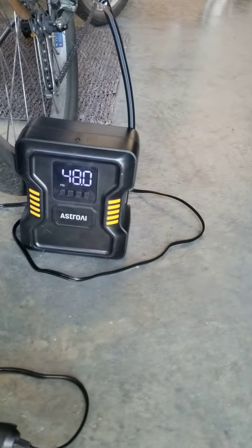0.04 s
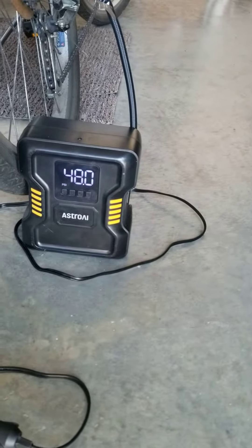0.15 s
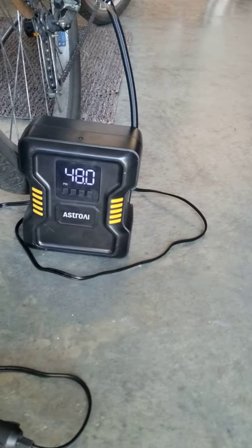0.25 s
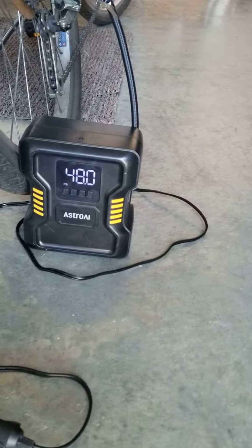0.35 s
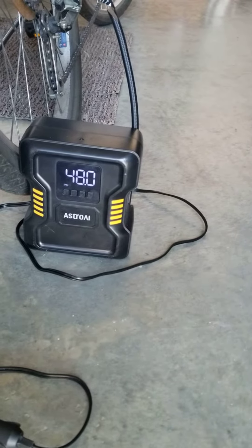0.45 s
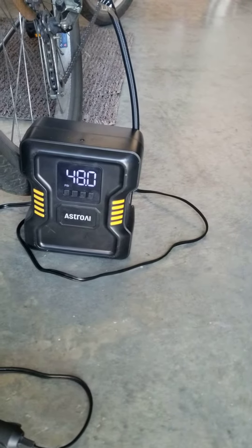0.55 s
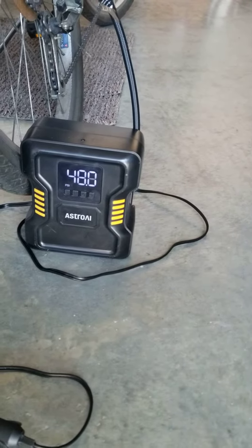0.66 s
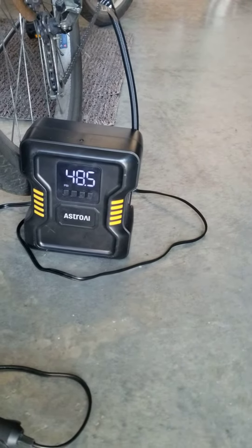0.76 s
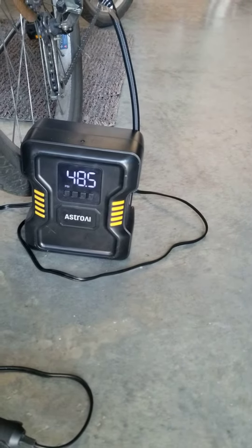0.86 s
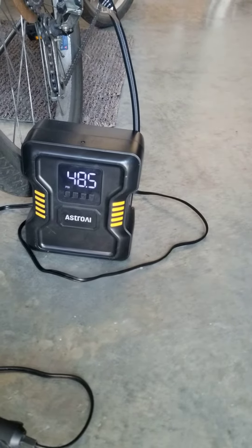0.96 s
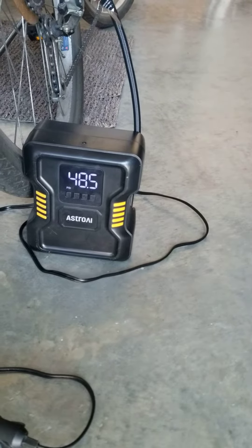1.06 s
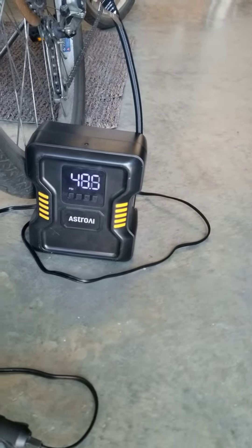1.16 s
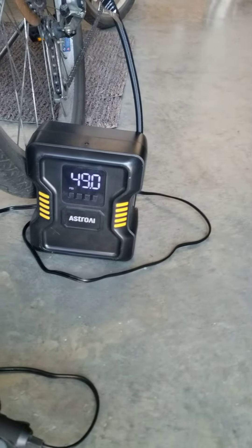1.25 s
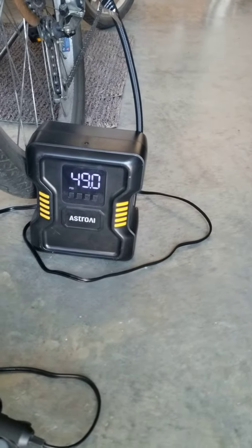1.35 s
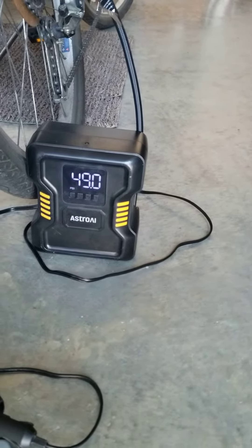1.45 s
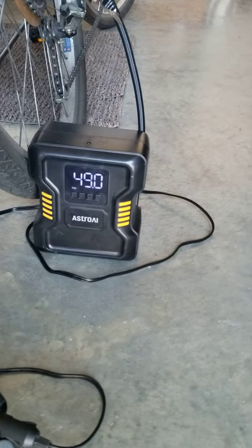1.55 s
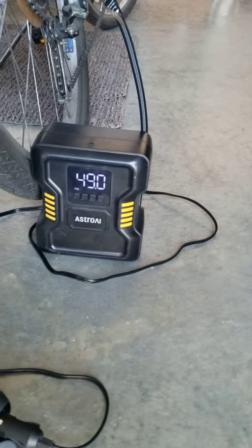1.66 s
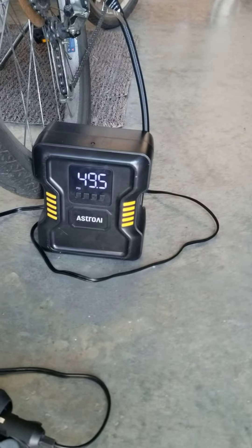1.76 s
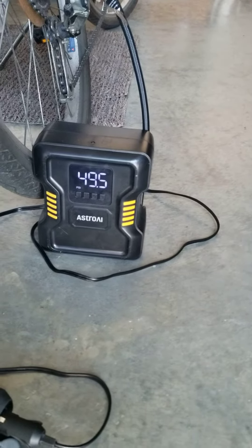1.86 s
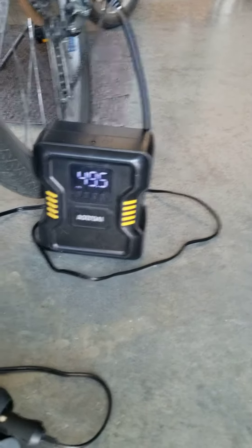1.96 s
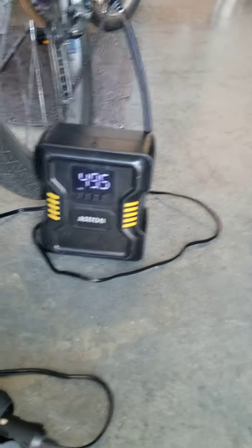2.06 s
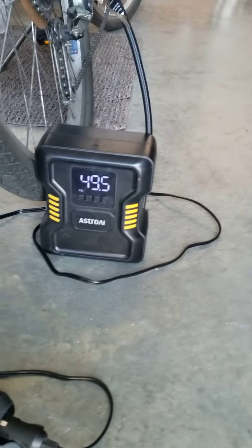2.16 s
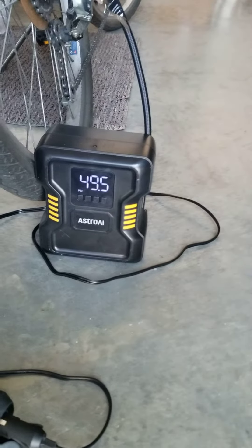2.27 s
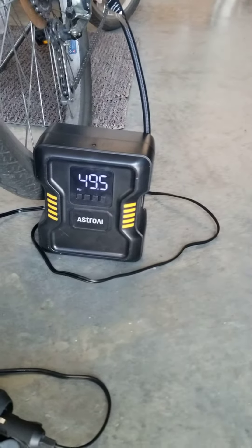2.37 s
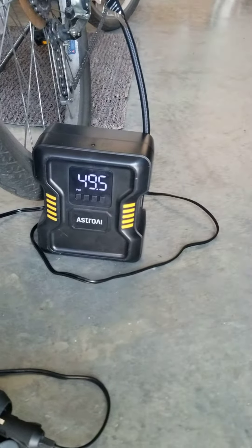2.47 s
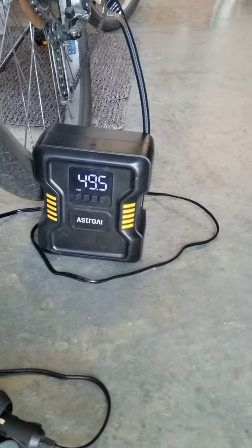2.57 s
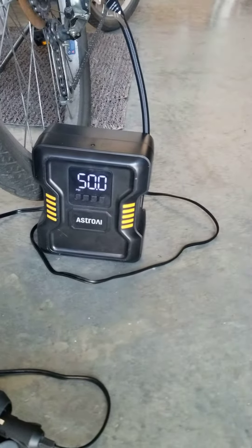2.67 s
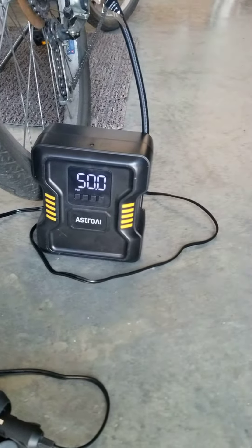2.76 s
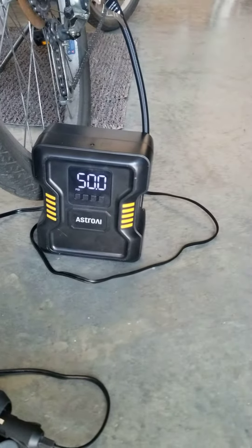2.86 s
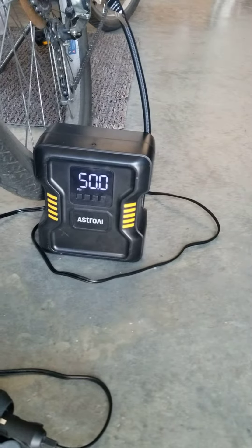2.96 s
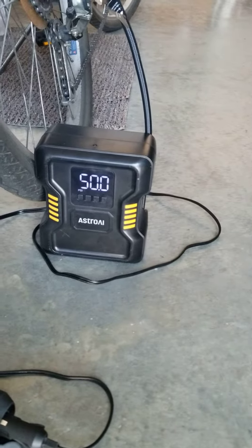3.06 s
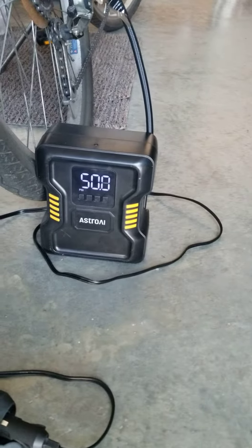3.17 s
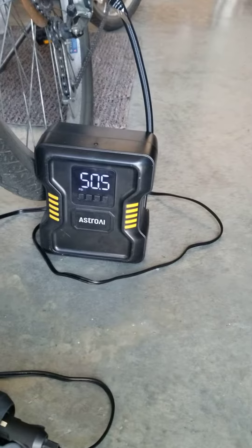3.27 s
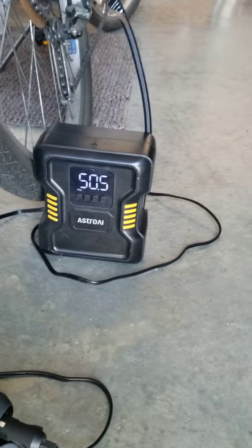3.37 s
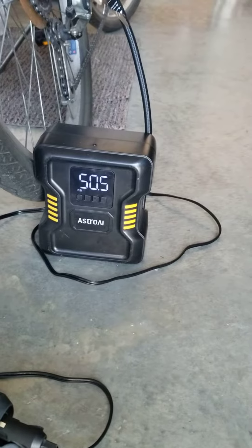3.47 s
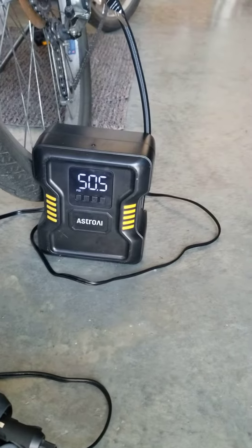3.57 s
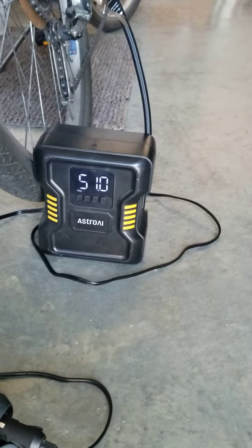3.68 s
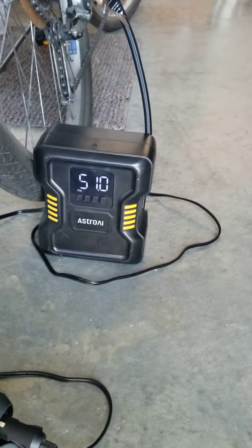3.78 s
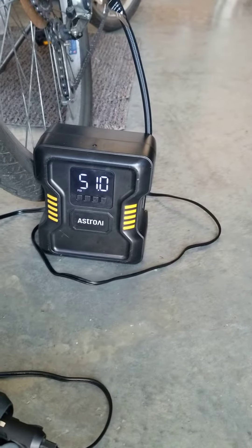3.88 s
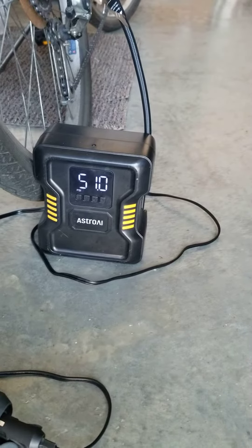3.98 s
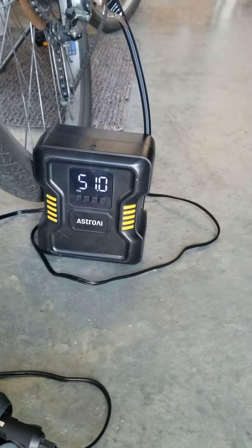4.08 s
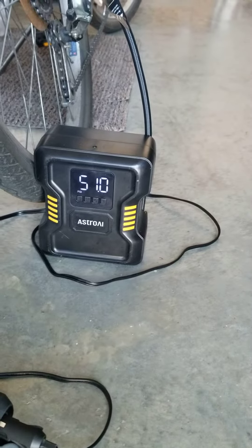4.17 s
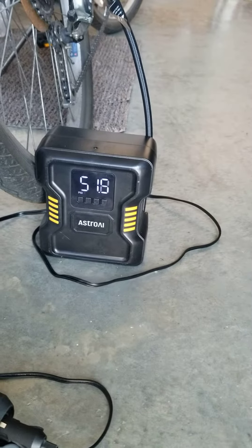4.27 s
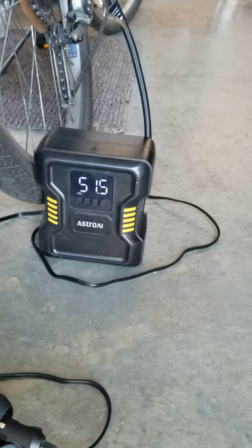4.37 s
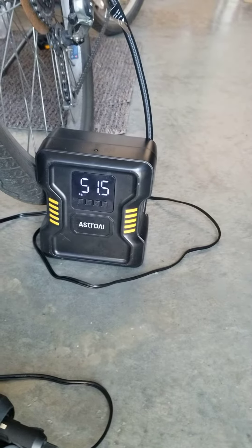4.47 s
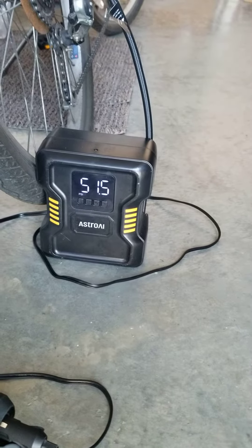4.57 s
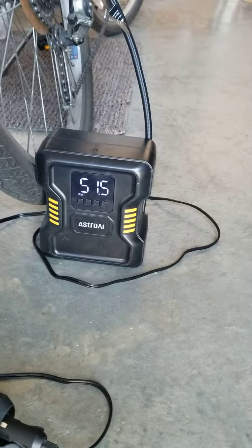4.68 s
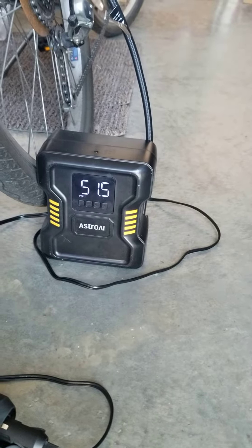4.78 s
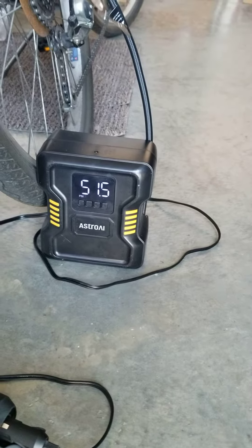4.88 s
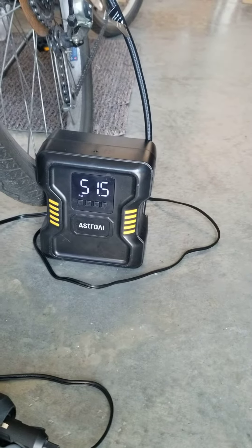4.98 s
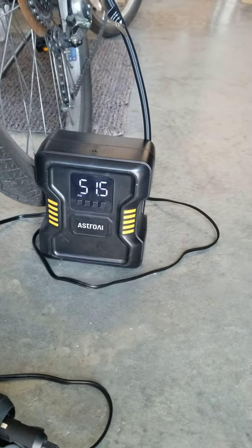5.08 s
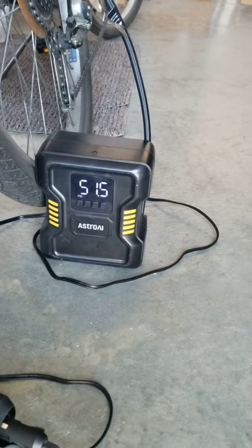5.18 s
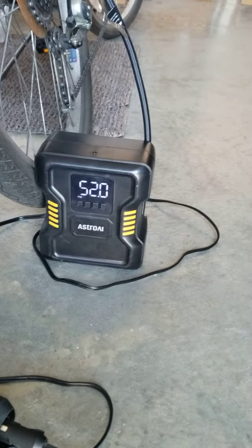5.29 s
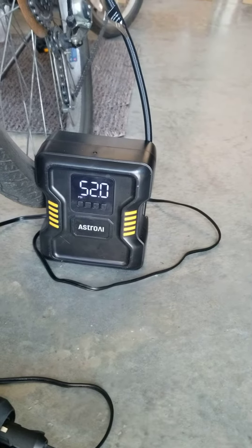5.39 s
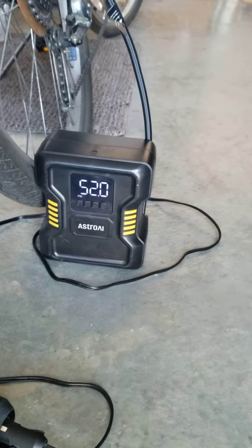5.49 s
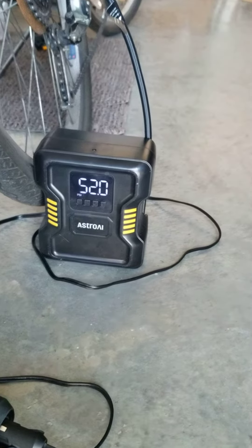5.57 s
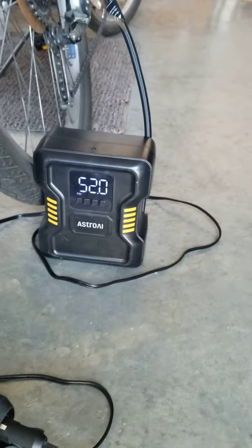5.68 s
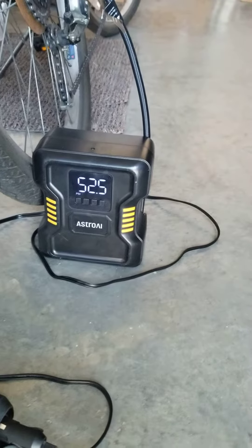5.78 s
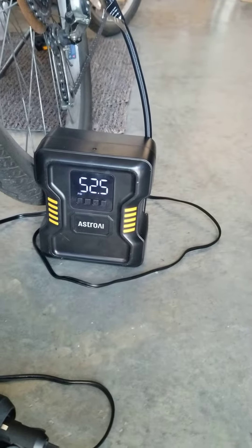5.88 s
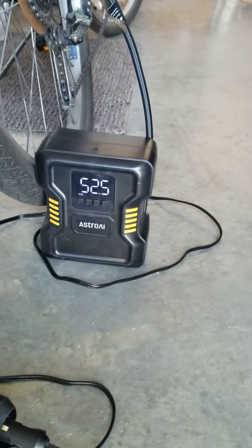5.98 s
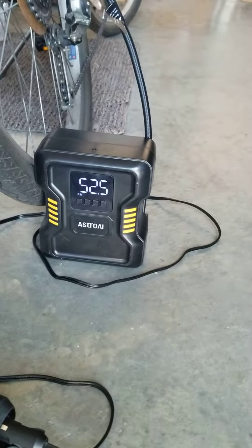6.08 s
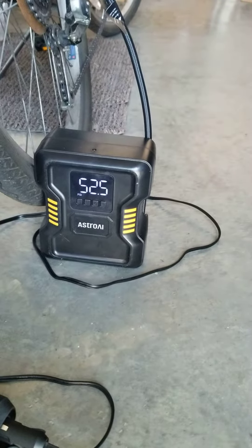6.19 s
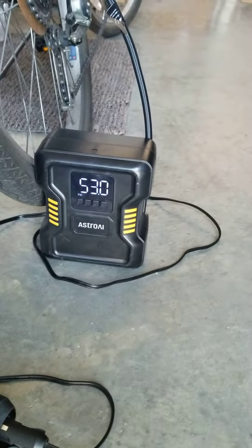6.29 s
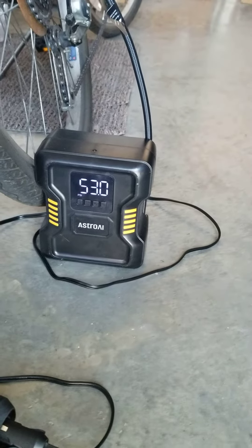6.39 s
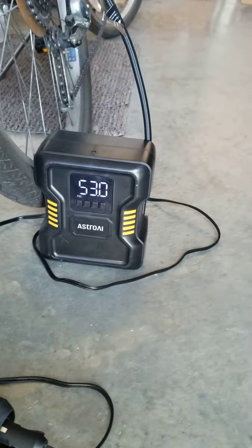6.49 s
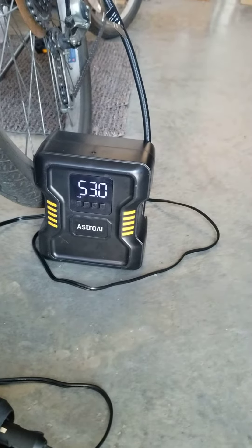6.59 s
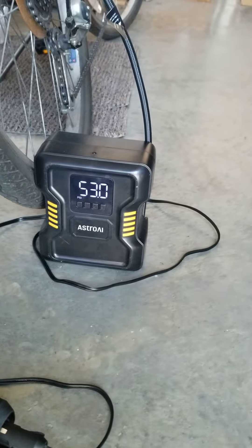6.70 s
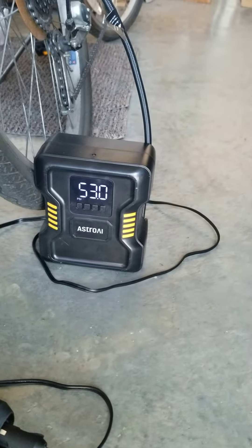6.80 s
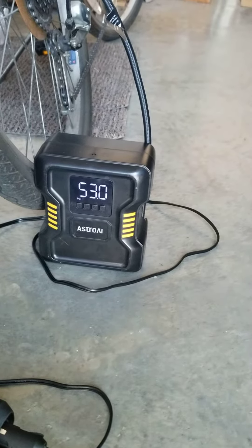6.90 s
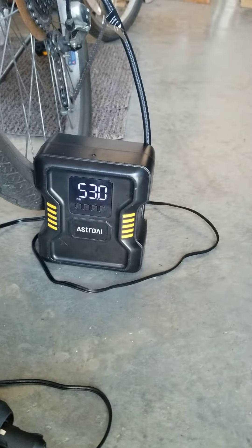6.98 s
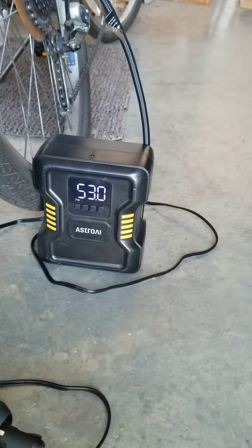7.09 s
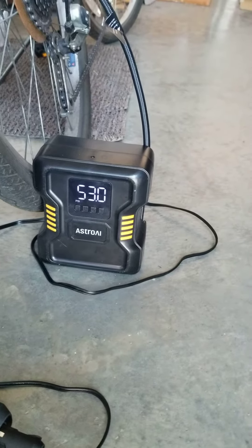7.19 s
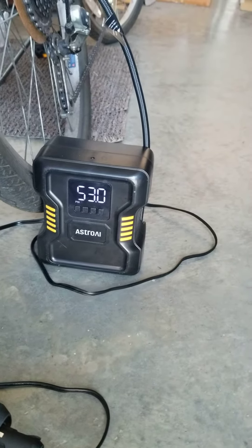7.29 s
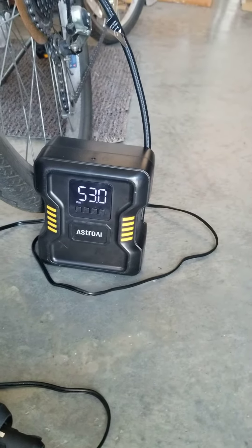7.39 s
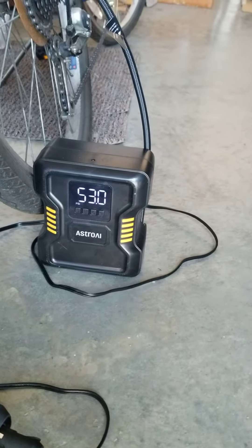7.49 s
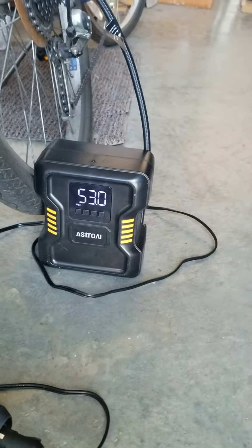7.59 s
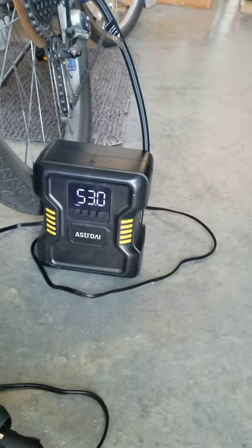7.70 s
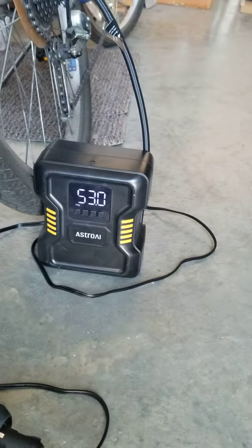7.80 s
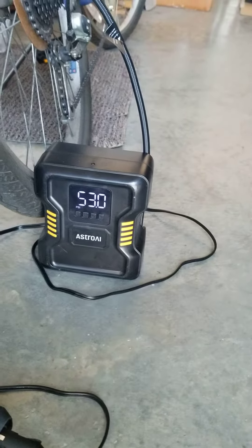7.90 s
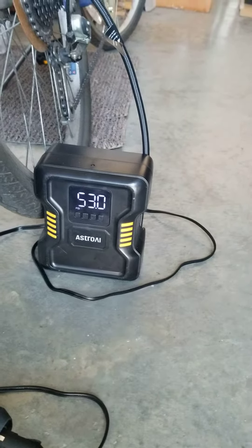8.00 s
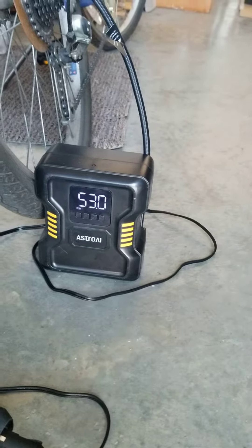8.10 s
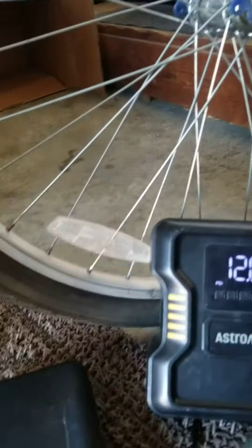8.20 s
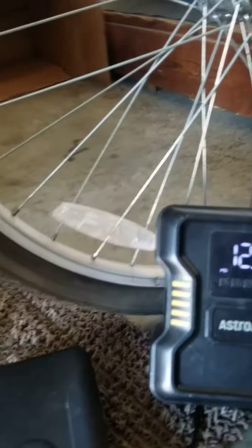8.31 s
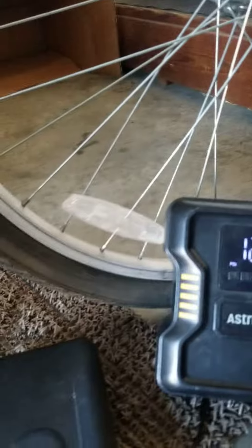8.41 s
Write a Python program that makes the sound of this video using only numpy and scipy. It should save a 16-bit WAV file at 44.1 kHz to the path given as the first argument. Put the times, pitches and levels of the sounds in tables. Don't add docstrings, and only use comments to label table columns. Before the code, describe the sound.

From 0 s a small electric piston air pump is already running at full speed on a concrete garage floor, about a metre from a handheld phone and slightly left. It makes a dense, harsh buzz at roughly 45 strokes a second: a strong case hum around 540 Hz, motor tones, gear whine near 2.4 kHz, and bright rattling with ticking valves. The drone stays nearly constant, its pitch sagging very slightly and the whine growing as tire pressure rises, especially after 5 s. A soft finger touch near 4.9 s is almost buried. At about 7.4 s the pump is switched off: within a quarter second it drops through uneven thuds and clacks, each weaker. The bare walls ring for about half a second. Then only faint distant machine hum and quiet room hush remain, with tiny ticks from 8.2 s and a faint cloth rustle around 8.4 s.

```python
import sys
import numpy as np
from scipy import signal
from scipy.fft import rfft, irfft, next_fast_len
from scipy.io import wavfile
from scipy.ndimage import uniform_filter1d

SR = 44100
rng = np.random.default_rng(int(sys.argv[2]) if len(sys.argv) > 2 else 0)


def store_pcm(level_fs):
    pcm = np.round(np.clip(level_fs, -1, 1) * 32767).astype(np.int16)
    wavfile.write(sys.argv[1], SR, np.atleast_2d(pcm).T)


def magnitude_from_level(level_db):
    exponent = np.asarray(level_db, float) / 20
    return 10 ** exponent


N = 372644

WHEEL_TEETH, PINION_TEETH, ROTOR_SLOTS = 53, 11, 3
OFF_S = 7.38


def tones(turns, pressure, hum_db, whine_db):
    # crank multiple, level in dB at low pressure, gain in dB at high pressure.
    orders = [(1, -39.5, -1), (2.05, -35.5, -1.5), (2.97, -37.5, 0), (3.92, -37.5, -3.5),
              (4.993, -25.5, -1), (6, -35, -3.5), (7, -29.5, -1), (8.07, -28.5, 1.5), (9.01, -29, -2.5),
              (10.005, -11, -9.5), (11, -16.5, 13), (11.97, 0, 2), (13, -6.5, -1.5), (14, -7, 2),
              (15, -16.5, 4.5), (16.03, -19.5, 0), (19.1, -20, -2.5), (20, -21.5, -2.5),
              (22.16, -19.5, -1.5), (23, -12, -4), (24, -16, -1.5)]
    # crank multiples above the tone, level in dB,
    # gain in dB at high pressure.
    slot_sides = [(-4, -9.5, 0), (-3, -10, 7), (-2, -14.5, -1.5), (-1, 3, -2.5), (0, 6.5, 1.5), (1, -26, 1),
                  (2, -16.5, 5.5)]
    angle = 2 * np.pi * turns

    hum = 0
    for k, db, gain_db in orders:
        bend = 2.625 - 0.2 * (k - 11.5) ** 2
        hum = hum + crank_tone(k, db, gain_db, bend, angle, pressure)

    slots = ROTOR_SLOTS * WHEEL_TEETH / PINION_TEETH
    motor = sum(crank_tone(slots + k, db, gain_db, -2.15, angle, pressure) for k, db, gain_db in slot_sides)

    load = np.exp(2.4 * (np.cos(angle - 4.3) - 1))
    slip = 0.3 * walk(25) + 0.33 * np.sin(angle - 4.3)
    whine = load * wobble(1.7, 35) * np.cos(WHEEL_TEETH * angle + slip)

    place_rad, sag_orders, sharpness = 4.2, 2.0, 2.5
    mesh_load = np.exp(sharpness * np.cos(angle - place_rad))
    mesh_slip = -sag_orders * np.sin(angle - place_rad) + 0.35 * walk(25)
    mesh = mesh_load * wobble(2.2, 30) * np.cos(2 * WHEEL_TEETH * angle + mesh_slip)

    case = magnitude_from_level(hum_db) * (level(hum, -1.5) + level(motor, -4.0))
    return case + magnitude_from_level(whine_db) * (level(whine, -3.5) + level(mesh, -14.5))


def crank_tone(order, db, gain_db, phase, angle, pressure):
    gain = magnitude_from_level(db) * (1 + (magnitude_from_level(gain_db) - 1) * pressure)
    return gain * wobble(0.65, 15) * np.cos(order * angle + phase)


def rattle(turns, hum_db):
    # frequency in Hz, width in Hz, rattle in dB, knock in dB,
    # place in the turn from 0 to 1, swell per turn in dB.
    parts = [(585, 266, -12.5, -33.5, 1, 3.5), (840, 82, -25, -30, .7, 5.5),
             (1071, 120, -12.5, -13, .72, 3.5), (1502, 425, -4, -12, .66, 7),
             (1856, 220, -11.5, -13.5, .7, 11), (2276, 440, -12.5, -11, .64, 4),
             (3023, 140, -16, -18, .4, 3.5), (3435, 390, -7.5, -14.5, 0.55, 5.5),
             (2843, 70, -21.5, -28, 0.3, 3), (3860, 470, -4.5, -7.5, 0.68, 1),
             (4464, 350, -19.5, -4, .58, 4), (4734, 200, -26, -13, .58, 3),
             (12350, 6700, -13, -22, 0.49, 24.5), (10180, 500, -33.5, -36, 0.4, 15.5),
             (12200, 600, -24, -28.5, .45, 12), (13170, 700, -18, -23.5, .44, 12)]
    # frequency in Hz, level in dB per Hz.
    bed = [(30, -44.5), (120, -42.5), (200, -25), (300, -18), (520, -4.5), (800, -6.5), (1500, -2.5),
           (2100, -5.5), (3600, -3), (5000, -7.5), (6400, -16), (8000, -33.5), (10000, -21), (13500, -13.5),
           (15500, -36.5)]
    tooth = (turns * WHEEL_TEETH).astype(int)
    strength = magnitude_from_level(2.37 * rng.standard_normal(N // 10))[tooth]
    impacts = rng.standard_normal((2, N)) * strength * wobble(1.11, 40)

    out = level(colour(impacts * swell(turns, 0.39, 6.0), bed), -1.88)
    for hz, width, rattle_db, knock_db, place, depth_db in parts:
        loose = ring(impacts * swell(turns, place - 0.1, depth_db), hz, width)
        loose = level(loose, rattle_db - 6.5)
        knock = level(ring(knocks(turns, place, 1.9), hz, width), knock_db - 8.0)
        gain = magnitude_from_level(hum_db + 4.5) if hz < 700 else 1
        out = out + gain * wobble(0.8, 8.3) * (loose + [knock, 0.26 * knock])
    return out


def swell(turns, place, depth_db, rise=0.16):
    since = (turns - place) % 1
    return magnitude_from_level(depth_db * np.where(since < rise, since / rise, (1 - since) / (1 - rise)))


def knocks(turns, place, scatter_db):
    count = np.floor(turns - place + 1).astype(int)
    strength = magnitude_from_level(scatter_db * rng.standard_normal(N // 500))
    return (np.diff(count, prepend=count[0]) > 0) * strength[count]


def strokes():
    # start in seconds, case thud in dB, clack in dB, valve ring in dB.
    last = [
        (7.38, -16.5, -19.5, -16.5),
        (7.400, -32.5, -14.5, -10.5),
        (7.412, -14, -22, -26.5),
        (7.44, -27.5, -18, -26),
        (7.452, -29, -25.5, -28.5),
        (7.49, -23, -37, -31.5),
        (7.53, -40, -42, -37.5),
        (7.58, -38, -48, -50),
        (7.64, -44, -49, -50),
    ]
    # frequency in Hz, width in Hz.
    modes = [(580, 150), (1400, 900), (3830, 350)]
    times, *levels = np.transpose(last)
    out = 0
    for db, (hz, width) in zip(levels, modes):
        envelope = uniform_filter1d(bursts(times, db - 3.5, 0.0069), size=200, origin=99)
        out = out + ring(envelope * rng.standard_normal(N), hz, width) * np.sqrt(SR / width)
    return out


def spread(shared, own):
    # frequency in Hz, left minus right in dB.
    left = [(60, 2), (110, 4.5), (200, 4), (380, 5), (700, 5.5), (1290, 2.5), (2380, 6), (4400, 2.5),
            (8120, -2.5), (15000, 0)]
    # frequency in Hz, level in dB.
    apart = [(60, -27), (600, -16.5), (1400, -6.5), (2000, -4), (2900, -6), (3900, -7.5), (7000, -1.5),
             (12500, -3.5), (15000, -6)]
    # frequency in Hz, radians the left leads.
    lead = [(0, 0), (2410, 0.4), (2930, -1.2), (3960, -0.1), (5170, -10.3), (5680, -9.2), (6290, -13.7),
            (7240, -13.0), (8530, -16.3), (11500, -10.5), (12000, -12.6), (13100, -15.1), (13700, -19.5),
            (15300, -18.8)]
    own = colour(own, apart)
    return np.array([colour(shared + own, left, 0.6, lead), colour(shared - own, left, -0.44, lead)])


def garage(x):
    # frequency in Hz, seconds to fall by 60 dB.
    decay = [(100, 0.31), (600, 0.46), (2000, 0.49), (5000, 0.39), (10000, 0.42), (16000, 0.1)]
    # frequency in Hz, level in dB.
    wall_colour = [(100, -1), (300, 4), (400, 2.5), (500, -1), (720, 8), (1400, -4.5), (2400, -1.5),
                   (3800, -1), (4600, 5), (8000, -3), (16000, -0.5)]
    t = np.arange(int(0.8 * SR)) / SR
    hz, t60 = np.transpose(decay)
    echo = 0
    for f in 60 * 2.0 ** np.arange(9):
        octave = [(f / 2, -40), (f / 1.3, -3), (f, 0), (f * 1.5, -3), (f * 2, -40)]
        noise = colour(rng.standard_normal((2, len(t))), octave)
        echo = echo + noise * magnitude_from_level(-60 * t / np.interp(f, hz, t60))
    echo = echo * np.clip((t - 0.006) / 0.015, 0, 1)
    echo = echo / np.sqrt(np.sum(echo ** 2, axis=1, keepdims=True))
    return signal.oaconvolve(x, colour(echo, wall_colour), axes=1)[:, :N]


def background():
    # frequency in Hz, level in dB.
    faint = [(226, -74), (377, -74.5), (452, -79), (582, -72)]
    # frequency in Hz, level in dB per Hz.
    quiet = [(25, -7.5), (140, -2.5), (300, -2), (600, 1), (900, -15.5), (1600, -23), (4000, -23.5),
             (15600, -34.5)]
    # middle in seconds, level in dB.
    handling = [
        (4.85, -56),
        (5.0, -64.5),
    ]
    # start in seconds, level in dB.
    settling = [
        (8.185, -76),
        (8.28, -78),
        (8.4, -69.5),
    ]
    t = np.arange(N) / SR

    far = machine(t) + drone()
    far = far + sum(magnitude_from_level(db + 1.0) * wobble(3.0, 11) * np.sin(2 * np.pi * hz * t) for hz, db in faint)
    hush = level(colour(rng.standard_normal((2, N)), quiet), -67.5)

    brush = sum(magnitude_from_level(db) * np.exp(-((t - s) / 0.05) ** 2) for s, db in handling)
    brush = brush * level(ring(rng.standard_normal((2, N)), 70, 90), 0)

    ticks = bursts(*np.transpose(settling), 0.004)
    ticks = ticks * level(ring(rng.standard_normal(N), 2200, 3500), 0)
    cloth = np.exp(-((t - 8.38) / 0.072) ** 2) * level(ring(rng.standard_normal(N), 350, 400), -65)
    return spread(far + ticks + cloth + hush[0], 1.7 * hush[1]) + brush


def machine(t):
    tone_hz = [150.7, 301.5, 538.3]
    tone_db = [-72, -70, -62]
    # tone in Hz, middle in seconds, gain in dB, half length in seconds.
    swells = [
        (150.7, 7.6, 9.5, .25),
        (150.7, 8.38, 11.5, 0.16),
        (150.7, 8.1, -8, 0.069),
        (301.5, 7.765, 14, 0.042),
    ]
    out = 0
    for hz, db in zip(tone_hz, tone_db):
        for f, s, gain_db, half in swells:
            if abs(f / hz - 1) < 0.1:
                db = db + gain_db * np.exp(-((t - s) / half) ** 2)
        out = out + magnitude_from_level(db + 4.0 + 1.5 * walk(21)) * np.sin(2 * np.pi * hz * t)
    return out


def drone():
    # time in seconds, pitch in Hz, level in dB.
    path = [(0.2, 160.4, -68), (1.5, 162.7, -66), (2.8, 161, -62), (3.4, 159, -63), (3.75, 160, -71),
            (4.2, 158, -62), (4.9, 158, -61), (5.2, 158, -71.5), (5.7, 156, -62.5), (6.2, 157.7, -68),
            (6.6, 153.6, -58), (7.3, 153, -60)]
    hz, db = curve(path)
    angle = 2 * np.pi * np.cumsum(hz) / SR
    fade = np.clip((OFF_S - np.arange(N) / SR) / 0.15, 0, 1)
    return magnitude_from_level(db) * fade * (np.sin(angle) + magnitude_from_level(3.5) * np.sin(2 * angle))


def level(x, db):
    return x * magnitude_from_level(db) / np.sqrt(np.mean(x ** 2))


def curve(table):
    s, *columns = np.transpose(table)
    return [np.interp(np.arange(N) / SR, s, c) for c in columns]


def colour(x, table, power=0.9, turn=((1, 0), (2, 0))):
    hz, db = np.transpose(table)
    size = next_fast_len(x.shape[-1])
    bins = np.arange(size // 2 + 1) * SR / size
    gain = magnitude_from_level(power * np.interp(np.log(bins + 1), np.log(hz), db))
    phase = power * np.interp(bins, *np.transpose(turn))
    return irfft(rfft(x, size) * gain * np.exp(1j * phase), size)[..., :x.shape[-1]]


def ring(x, hz, width):
    b, a = signal.iirpeak(hz, hz / width, SR)
    return signal.lfilter(b, a, signal.lfilter(b, a, x))


def walk(rate):
    steps = rng.standard_normal(int(N * rate / SR) + 2)
    return 1.1 * np.interp(np.arange(N) * rate / SR, np.arange(len(steps)), steps)


def wobble(db, rate):
    steps = magnitude_from_level(db * rng.standard_normal(int(N * rate / SR) + 2))
    return np.interp(np.arange(N) * rate / SR, np.arange(len(steps)), steps)


def bursts(times, db, decay_s):
    start = np.zeros(N)
    start[(np.array(times) * SR).astype(int)] = magnitude_from_level(np.array(db))
    return signal.lfilter([1], [1, -np.exp(-1 / (decay_s * SR))], start)


def scene():
    # time in seconds, turns a second.
    crank = [(0.0, 45.255), (0.8, 45.15), (1.6, 45.178), (2.4, 45.056), (3.2, 45.072), (4.0, 45.146),
             (4.8, 45.121), (5.4, 45.083), (5.9, 44.967), (6.4, 44.846), (6.9, 44.847), (7.34, 44.85)]
    t = np.arange(N) / SR
    powered, = curve(crank)

    light_hz, heavy_hz = 45.25, 44.85
    pressure = np.clip((light_hz - powered) / (light_hz - heavy_hz), 0, 1)

    brake_per_s2 = 300
    speed = np.maximum(powered - brake_per_s2 * np.maximum(t - OFF_S, 0), 0)
    turns = np.cumsum(speed) / SR

    hum_db = -3.5 + pressure
    whine_db = -9.5 + 6 * pressure
    shared, own = rattle(turns, hum_db)
    steady = tones(turns, pressure, hum_db, whine_db) * magnitude_from_level(1.34 * (speed - powered))

    pump = spread(shared + steady, own + 0.14 * np.roll(steady, 18))
    pump = pump * magnitude_from_level(-22.0) * (speed / powered) ** 2.1
    last = strokes()
    pump = pump + spread(last, 0.5 * np.roll(last, 30))
    return pump + magnitude_from_level(-9.5) * garage(pump) + background()


def low_pass(x):
    return signal.sosfilt(signal.butter(12, 15760, fs=SR, output="sos"), x)


def record(dry):
    mix = np.tanh(0.89 * dry) / 0.91
    return low_pass(mix)


dry = scene()
out = record(dry)
store_pcm(out)
```